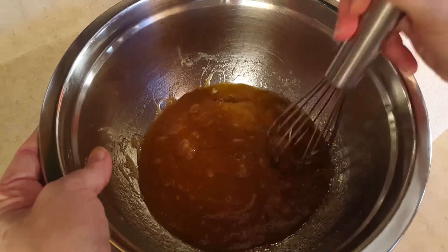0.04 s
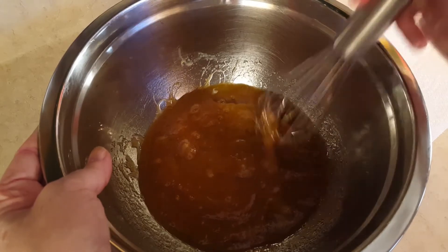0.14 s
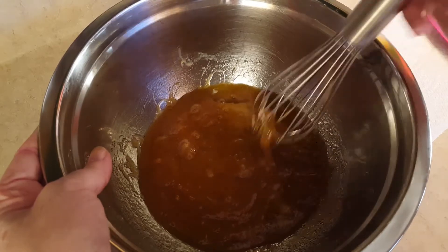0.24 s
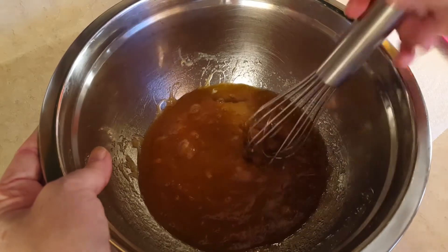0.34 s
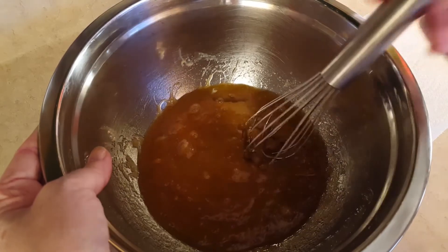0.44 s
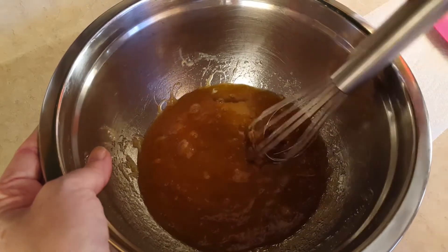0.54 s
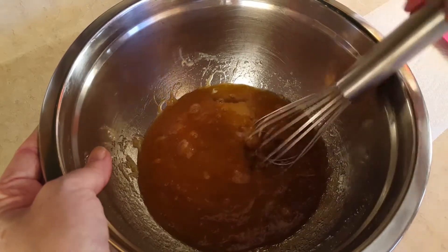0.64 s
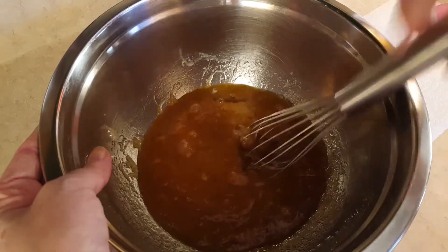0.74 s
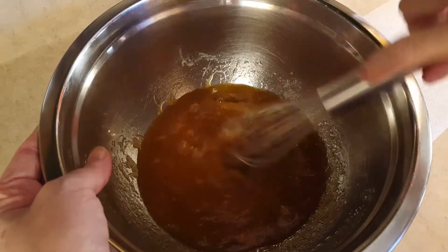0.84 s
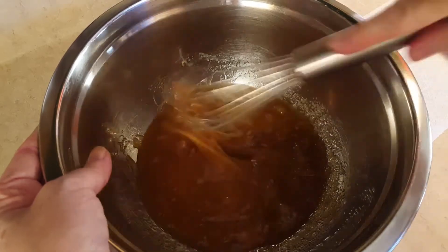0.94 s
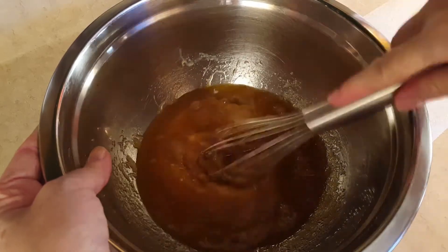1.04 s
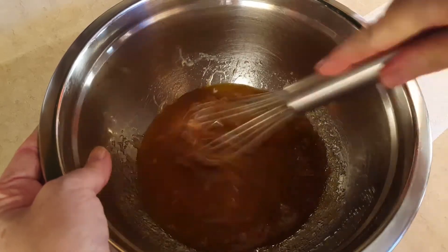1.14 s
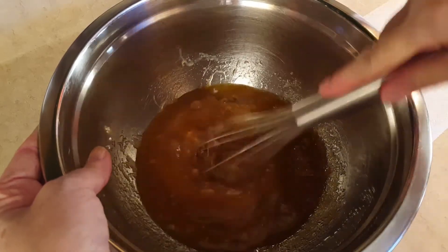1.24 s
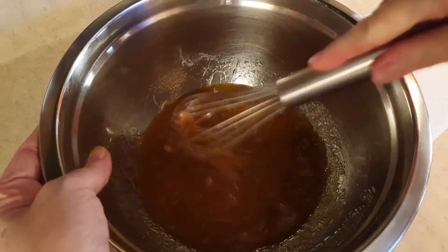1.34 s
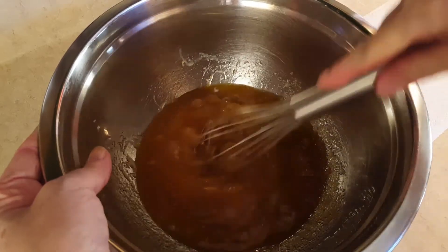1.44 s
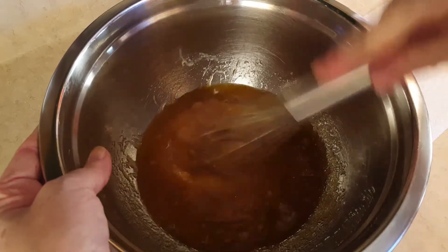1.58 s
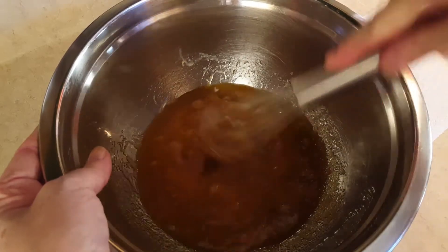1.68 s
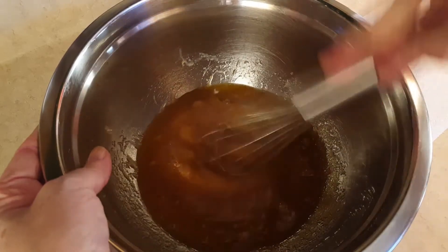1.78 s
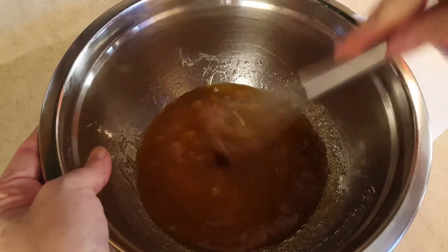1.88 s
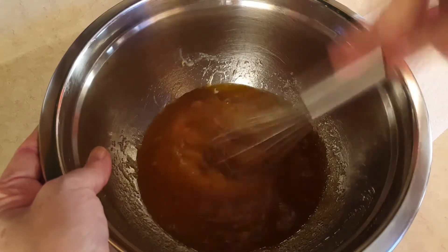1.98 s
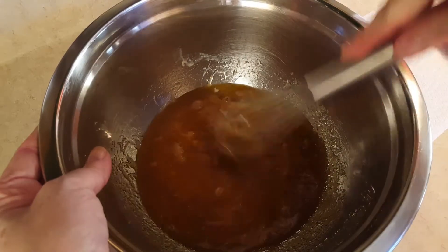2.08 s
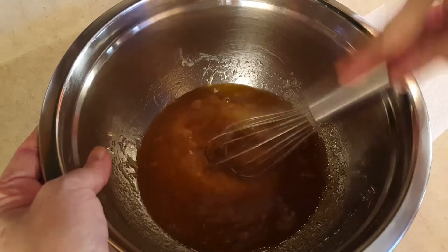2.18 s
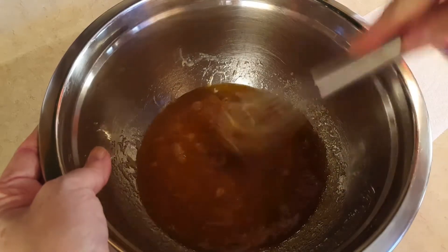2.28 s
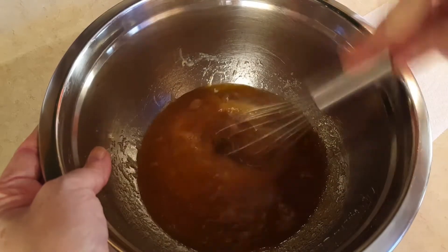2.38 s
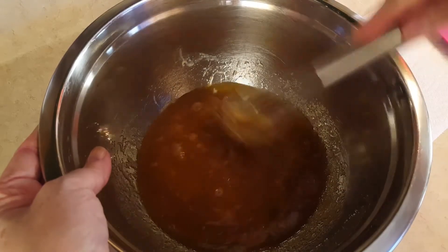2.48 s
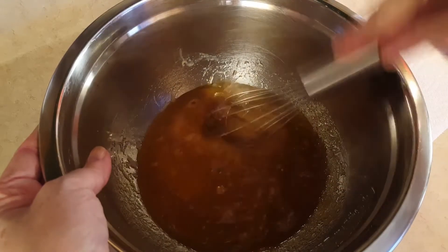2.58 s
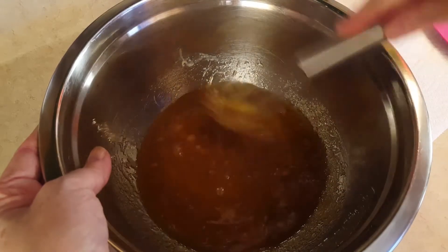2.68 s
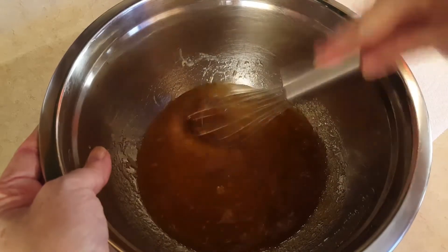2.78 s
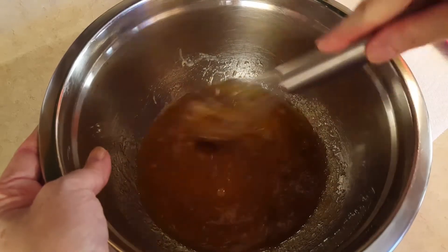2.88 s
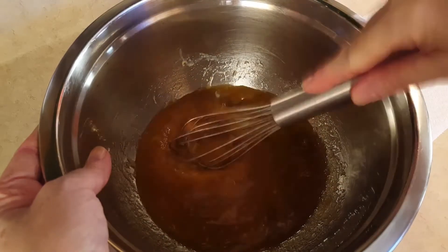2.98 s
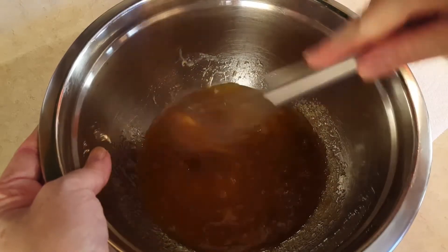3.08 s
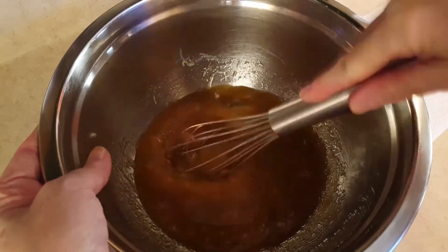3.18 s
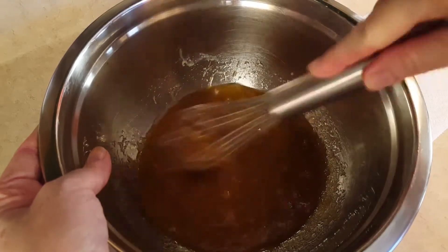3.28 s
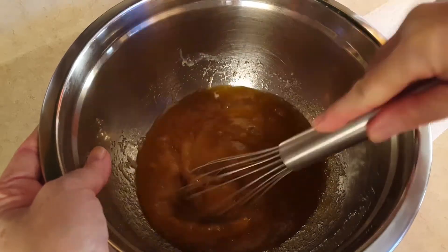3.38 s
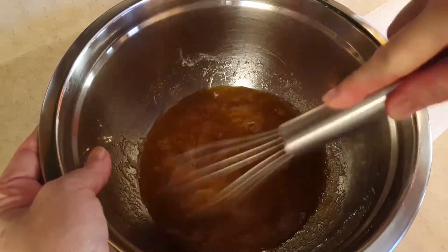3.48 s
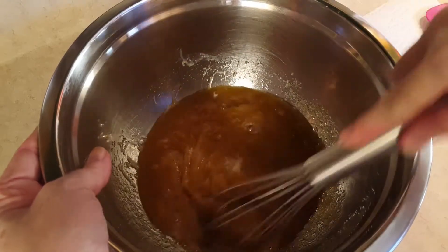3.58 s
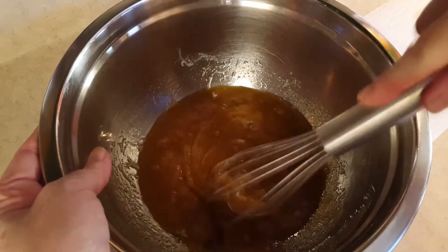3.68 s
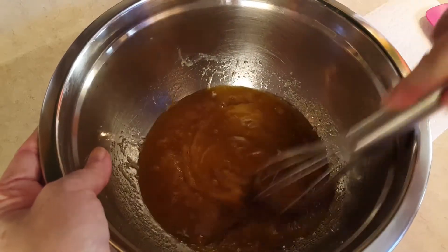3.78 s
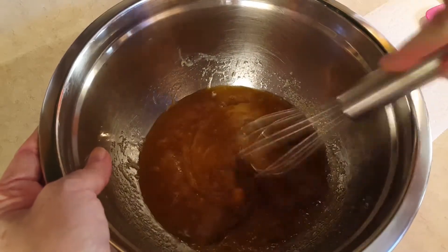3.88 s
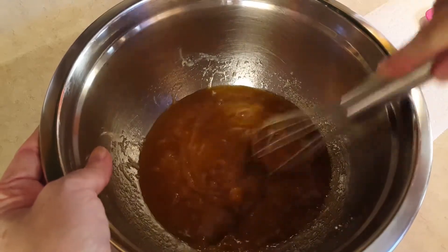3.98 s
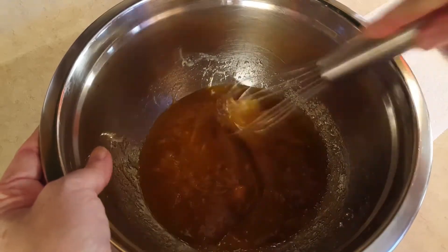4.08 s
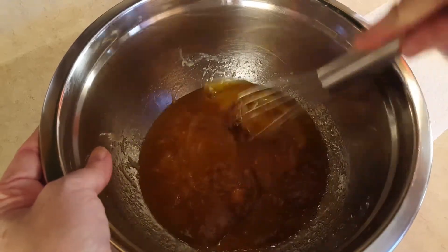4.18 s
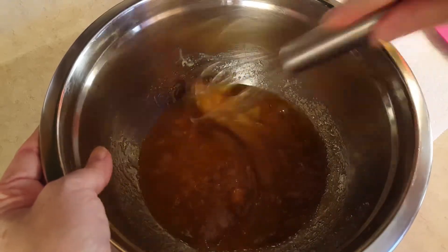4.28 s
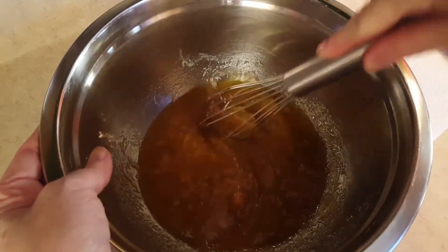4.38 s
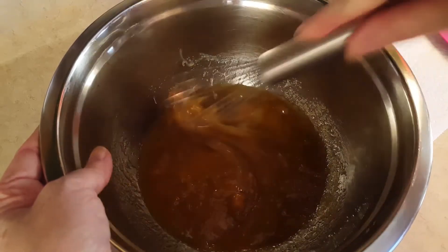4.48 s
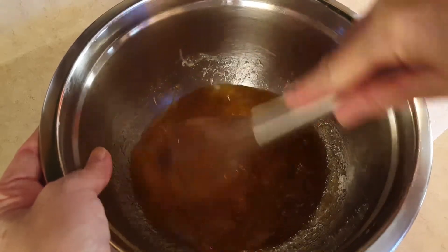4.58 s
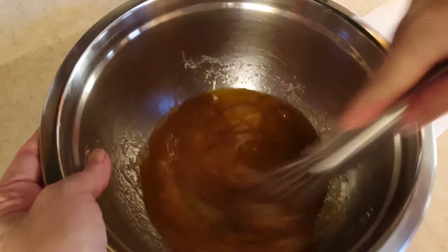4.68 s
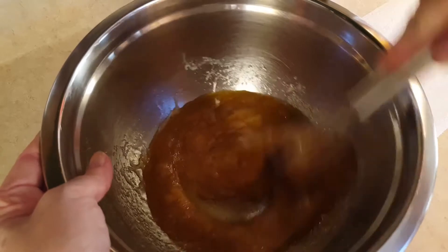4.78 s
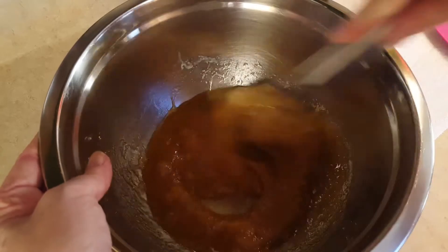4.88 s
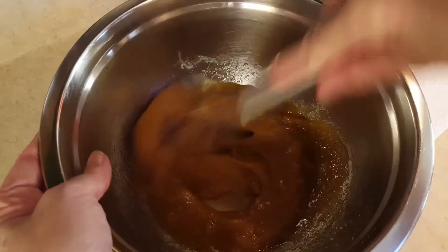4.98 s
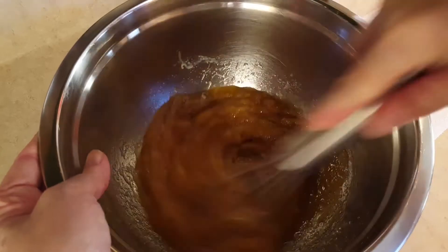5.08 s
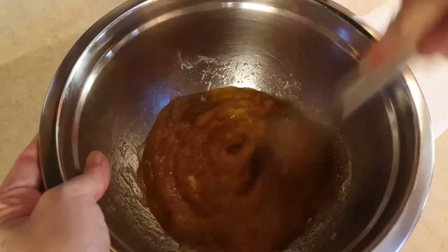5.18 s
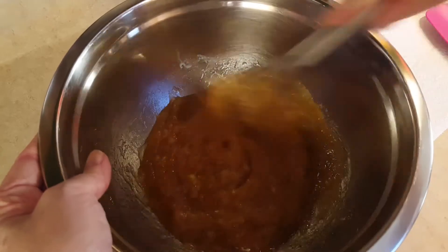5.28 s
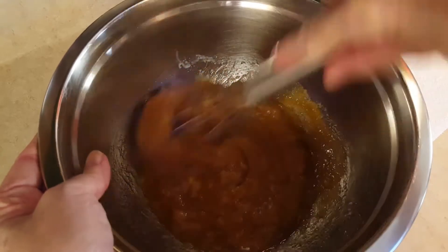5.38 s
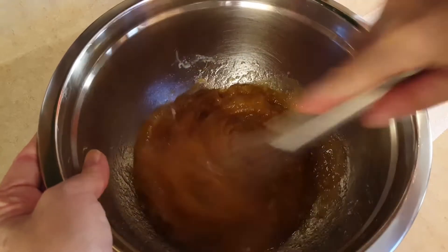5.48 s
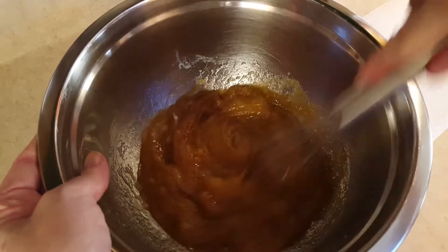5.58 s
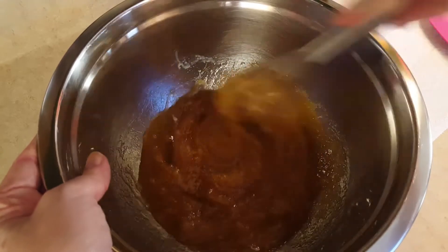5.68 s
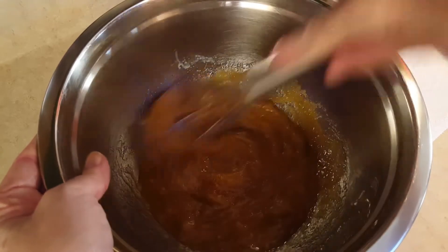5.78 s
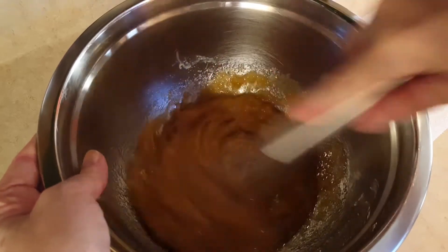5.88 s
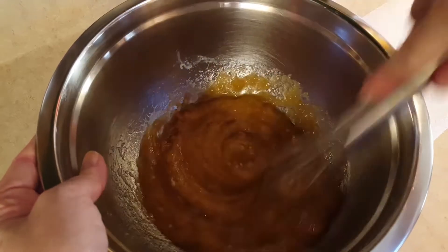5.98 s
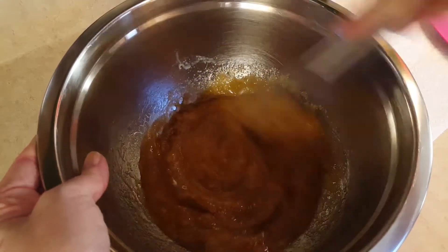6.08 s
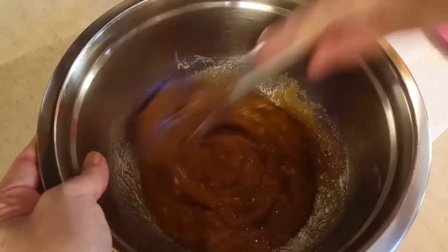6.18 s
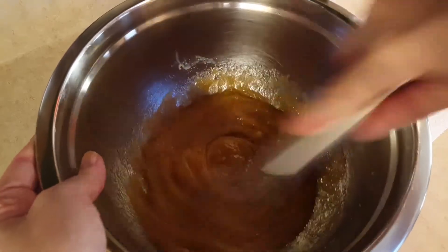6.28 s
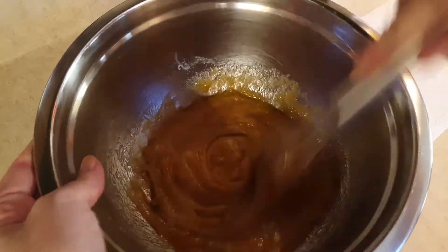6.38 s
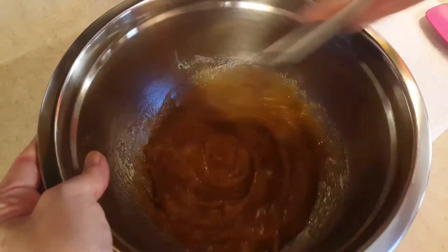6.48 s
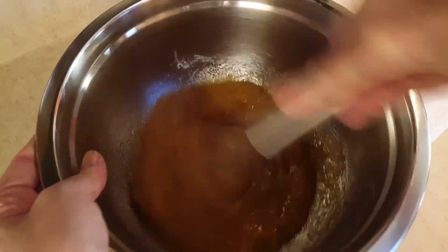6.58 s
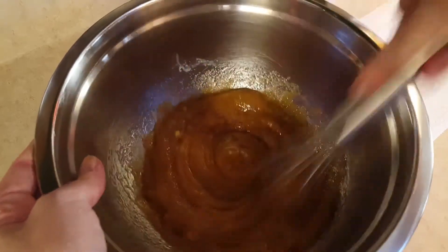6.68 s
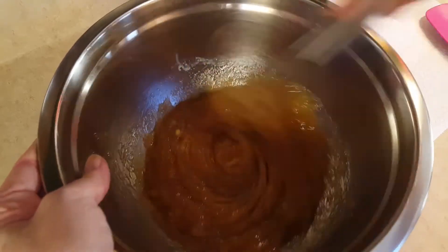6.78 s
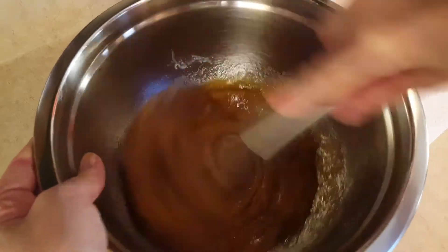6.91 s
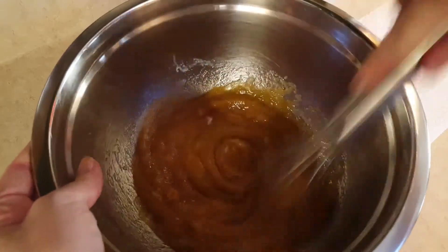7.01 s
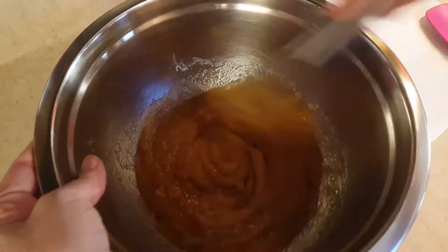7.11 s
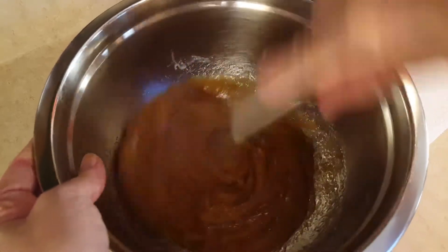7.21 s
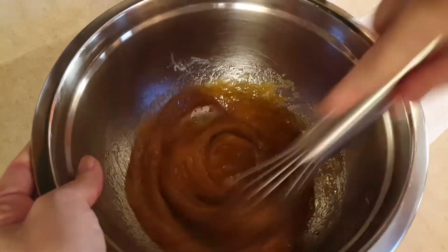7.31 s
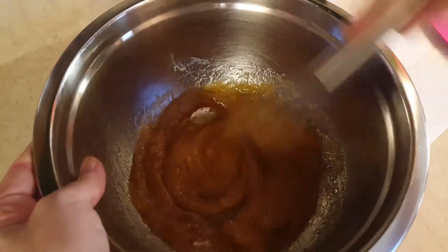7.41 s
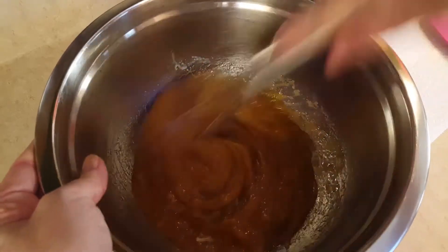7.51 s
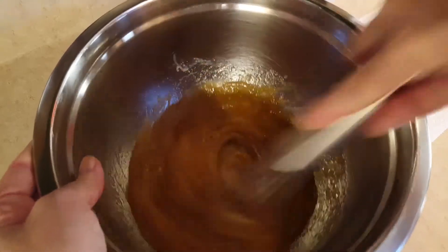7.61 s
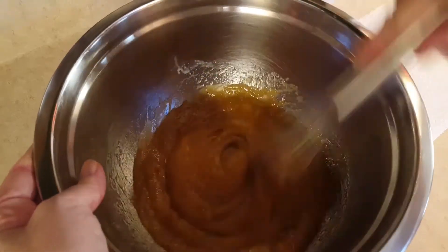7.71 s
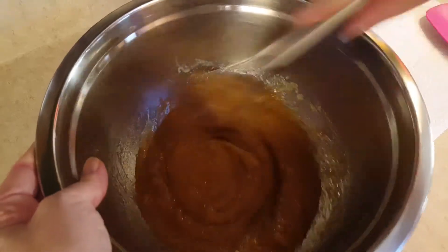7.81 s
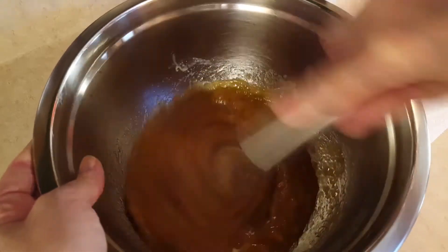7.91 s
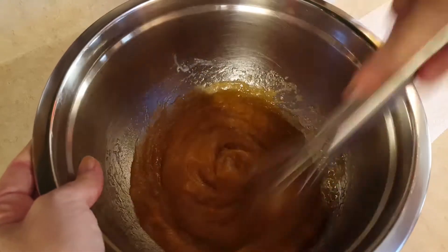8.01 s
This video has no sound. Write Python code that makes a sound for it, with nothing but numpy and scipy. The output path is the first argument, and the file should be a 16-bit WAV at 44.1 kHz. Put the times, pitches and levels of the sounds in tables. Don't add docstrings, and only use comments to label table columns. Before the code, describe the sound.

A few light taps and one bright rim clank lead into steady, evenly spaced whisk strokes, each a quick cluster of wire contacts on a damped steel bowl. Two harder rim hits follow, the last distorted. The background drops, then irregular circular stirring scrapes and crunches over sugar grains with thin wire clinks and soft thuds. Close microphone, short room reflections, automatic gain changing the hiss.

```python
import sys
import numpy as np
from scipy import signal
from scipy.io import wavfile

SR = 44100
rng = np.random.default_rng(int(sys.argv[2]) if len(sys.argv) > 2 else 0)


def persist_wave(psi):
    counts = np.round(np.clip(psi, -1, 1) * 32767).astype(np.int16)
    wavfile.write(sys.argv[1], SR, np.atleast_2d(counts).T)


def boost(x):
    u = np.asarray(x, float) / 20
    return 10 ** u


N = 355005
STIR_START_S = 4.52

# start_s, level_db
ROOM = [
    (0.0, -37.5),
    (3.9, -36),
    (4.15, -53),
    (4.57, -44.5),
    (4.97, -33.5),
    (7.33, -33),
    (8.05, -32),
]
# start_s, peak_db, struck_patch_hz, wire_ticks_db (relative)
BLOWS = [(0.313, -16, 1310, -16), (0.379, -20, 1200, -14.5), (0.566, -22.5, 1150, -22),
         (0.608, -3.5, 1000, -24), (0.984, -10.5, 930, -11.5), (1.182, -16.5, 880, -17.5),
         (1.374, -13.5, 930, -15), (1.566, -9.5, 960, -21), (1.762, -8, 890, -19.5), (1.962, -6, 900, -25),
         (2.154, -8, 1710, -22), (2.356, -6.5, 895, -21), (2.554, -8, 1510, -17), (2.743, -13.5, 850, -18),
         (2.948, -6.5, 900, -26), (3.143, -8, 980, -17), (3.339, -8, 770, -14), (3.53, -11, 800, -6.5),
         (3.742, -1, 970, -17), (3.909, 7, 945, -15.5), (4.305, -18.5, 940, -15.5),
         (4.356, -30.5, 1070, -28), (4.475, -34, 1720, -9.5), (4.515, -22.5, 880, -17)]
# start_s, peak_db, struck_patch_hz, wire_ticks_db (relative)
GLANCES = [(4.699, -18.5, 1000, -18), (4.807, -13, 2030, -17), (4.933, -22.5, 1380, -10),
           (5.005, -9, 970, -21), (5.204, -19.5, 1970, -17), (5.279, -14, 1000, -11.5),
           (5.454, -19, 846, -12), (5.541, -20, 880, -43.5), (5.594, -23.5, 1470, -9.5),
           (5.635, -23, 2240, 2), (5.844, -16.5, 900, -11.5), (5.924, -17, 1760, -11.5),
           (6.089, -10.5, 766, -6), (6.317, -14, 1510, -12), (6.409, -13, 830, -21), (6.461, -12, 1800, -8),
           (6.549, -10, 790, -14), (6.654, -21.5, 1850, -18), (6.77, -15, 880, -6), (6.884, -8.5, 740, -16),
           (7.053, -23, 1200, -8), (7.094, -10.5, 2030, -4.5), (7.189, -19, 1880, -0.5),
           (7.241, -22, 1920, -15), (7.352, -21.5, 744, -16), (7.449, -12, 1760, -10),
           (7.543, -11.5, 890, -7.5), (7.735, -22.5, 1010, -35), (7.79, -11, 850, -3.5),
           (7.895, -21, 740, -10)]
# start_s, peak_db, thin_high_modes_db (relative)
RIM = [
    (0.6057, -6, -11.5),
    (3.74, -8, -9.5),
    (3.9075, -0.5, -16.5),
]
# pitch_hz, level_db, t60_s
WALL = [(880, 4, 0.024), (733, -3, 0.038), (960, 0, 0.046), (1057, -7, 0.029), (1136, -3, 0.055),
        (1316, -3, 0.029), (1447, 0, 0.029), (1608, -3, 0.021), (1700, -1, 0.036), (1867, -2.5, 0.037),
        (2030, -4.5, 0.04), (2266, -4, 0.034), (2414, -3.5, 0.015), (2770, 2.5, 0.0085)]
# pitch_hz, level_db, t60_s
BELLY = [(449, -7.5, 0.035), (466.4, -5.5, 0.071), (504.7, -2.5, 0.065), (536.8, 4.5, 0.11),
         (568, -5, 0.029), (640, -11.5, 0.062), (695, -14.5, 0.045)]
# pitch_hz, level_db, t60_s
LOW_BELLY = [(326, -40, 0.04), (323.2, -6.5, 0.11), (360, -8.5, 0.065), (420.4, -12.5, 0.089)]
# pitch_hz, level_db, t60_s
RIM_LOW = [(900, 16.5, .22), (1044, 7, 0.36), (1117, 9, 0.34), (1265, 6, 0.28), (1454, 5.5, 0.27),
           (1675, 1.5, 0.23), (1720, 0, 0.27), (1850, 2, .2), (2030, -13.5, .12), (2190, -15.5, 0.28)]
# pitch_hz, level_db, t60_s
RIM_HIGH = [(2800, -9, .3), (3330, -9, .2), (3600, 2, 0.2), (3850, 3, 0.22), (4150, 8, 0.2), (4390, 3, .15),
            (4960, 6.5, 0.17), (5160, 2, 0.1), (6050, -2, 0.22), (6600, -4, 0.2)]


def rms_one(x):
    return x / np.sqrt(np.mean(x ** 2) + 1e-20)


def in_time(rows):
    s, *columns = np.transpose(rows)
    return [np.interp(np.arange(N) / SR, s, column) for column in columns]


def gain_ride():
    return in_time(ROOM)[0] - ROOM[0][1]


def at_hz(points, hz):
    point_hz, point_db = np.transpose(points)
    return np.interp(np.log(hz), np.log(point_hz), point_db)


def ring(clicks, hz, t60):
    r = np.exp(-np.log(1000) / (t60 * SR))
    w = 2 * np.pi * hz / SR
    return signal.lfilter([0, np.sin(w)], [1, -2 * r * np.cos(w), r * r], clicks + 1e-18)


def soft(x, cut_hz):
    return signal.sosfilt(signal.butter(2, cut_hz, fs=SR, output="sos"), x)


def band_pass(x, order, low_hz, high_hz):
    return signal.sosfilt(signal.butter(order, [low_hz, high_hz], "band", fs=SR, output="sos"), x)


def flicker(depth_db, rate):
    r = np.exp(-80 * np.pi * rate / SR)
    slow = signal.lfilter([1], [1, -2 * r, r * r], rng.standard_normal(N // 40 + 2002))
    slow = slow[2000:]
    return np.interp(np.arange(N) / 40, np.arange(len(slow)), boost(depth_db * rms_one(slow)))


def room_noise():
    # pitch_hz, level_db (per Hz)
    air = [(15, -35), (25, -5.5), (53, 3), (70, -21), (82, -2), (317, -11.5), (463, -16), (516, -11.5),
           (1260, -29), (10100, -57), (11000, -45), (12200, -59.5), (16000, -63)]
    out = 0
    edges = 25 * 2 ** np.arange(0, 9.6, .5)
    white = rng.standard_normal((2, N))
    wander = [flicker(1.7, 41.0) for k in range(4)]
    for k, (low, high) in enumerate(zip(edges, edges[1:])):
        band = band_pass(white[k % 2], 2, low, high)
        out = out + boost(at_hz(air, np.sqrt(low * high))) * wander[k % 4] * band
    return boost(in_time(ROOM)[0] - 0.5) * rms_one(out)


def fine_modes():
    # pitch_hz, level_db (per Hz)
    grit_spectrum = [(2600, -8.5), (3060, -2), (4080, -3), (5100, -2), (6300, 0), (7300, -5), (9010, -8.5),
                     (12900, -16), (16000, -37.5)]
    pitches = np.geomspace(2600, 15500, 20)
    return [(hz, at_hz(grit_spectrum, hz) + 4.3 * np.log2(hz / 4000), 75.0 / hz) for hz in pitches]


def flurry(s, flurry_ms, count):
    draw = rng.random((len(s), 2, count))
    late = -np.log(1 - .98 * draw[:, 0])
    sizes = np.minimum(late / 0.61, 1) * np.exp(-.35 * late) * boost(-9.0 * draw[:, 1])
    at = (s[:, None] + late * np.reshape(flurry_ms, (-1, 1)) / 1000 - .0025) * SR
    return np.maximum(at, 0).astype(int), sizes / np.sqrt(count) * 2.293


def struck(modes, blow_db, contacts, patch_hz=None, scatter_db=3.5):
    at, sizes = contacts
    hz, mode_db, t60 = np.transpose(modes)
    gain_db = mode_db + scatter_db * rng.standard_normal((len(at), len(modes)))
    if patch_hz is not None:
        octaves_off = np.log2(hz / patch_hz[:, None])
        gain_db = gain_db + 9.0 * np.exp(-(octaves_off / .25) ** 2)
    strength = boost(gain_db) / np.sqrt(np.sum(boost(gain_db) ** 2, axis=1))[:, None]
    strength = strength * boost(blow_db)[:, None]
    out = np.zeros(N)
    for k in range(len(modes)):
        side = rng.uniform(-1.7, 1.7, sizes.shape)
        piled = np.abs(np.sum(sizes * side * np.exp(2j * np.pi * hz[k] * at / SR), axis=1))
        held = np.minimum(2, np.linalg.norm(sizes, axis=1) / piled)
        clicks = (strength[:, k] * held)[:, None] * sizes * side
        out += ring(np.bincount(at.ravel(), clicks.ravel(), N)[:N], hz[k], t60[k])
    return out


def landings():
    # start_s, peak_db, patch_hz, ticks_db (relative), wire_hz
    stray = [(.469, -34, 1780, -25, 3800), (.001, -27.5, 1450, -10, 4200), (3.236, -36.5, 1200, 5, 6040),
             (4.087, -55, 3200, 0, 4500), (4.105, -22.5, 1100, -20, 6000), (4.146, -56.5, 3200, 11, 7500),
             (4.278, -56, 3060, 5, 7500), (4.294, -46, 1510, -9, 3620), (4.525, -31.5, 3000, -2.5, 5500),
             (2.758, -10.5, 880, -17.5, 4470), (3.134, -28, 895, -1, 6000)]
    # start_s, peak_db
    leaders = [(1.162, -28), (1.363, -21.5), (1.938, -29), (2.536, -31.5), (2.736, -23.5), (2.938, -15),
               (3.32, -30), (3.723, -12)]
    leader_rows = [(s, db, 1100, -16) for s, db in leaders]
    rows = np.vstack([BLOWS, GLANCES, leader_rows])
    stirs = rows[:, 0] > STIR_START_S
    wire_hz = np.where(stirs, 6000, 4380)
    spread_oct = np.where(stirs, 0.26, 0.26 / 3)
    scatter = spread_oct * rng.standard_normal(200)[:len(rows)]
    return np.vstack([np.column_stack([rows, wire_hz * 2 ** scatter]), stray]).T


def blows():
    square = [.608, 2.155, 2.356, 2.947, 3.338, 3.742, 3.908, 4.933, 5.279, 6.409, 6.885, 7.451, 7.79]
    # start_s, peak_db, lower_modes_db (relative)
    thuds = [(0.003, -32.5, -4), (0.322, -14, -18), (0.38, -17.5, -13), (0.554, -19, -17),
             (0.605, -11, -14), (0.636, -10.5, -18), (0.985, -14.5, -11), (1.004, -10.5, -3.5),
             (1.182, -19.5, -3.5), (1.38, -8.5, -3.5), (1.571, -10.5, -6), (1.766, -7, -0.5),
             (1.965, -7, -6), (2.159, -7, -6), (2.361, -6, -8.5), (2.401, -13.5, 7.5), (2.565, -3.5, -9),
             (2.744, -11.5, -1), (2.756, -9.5, -0.5), (2.948, -16.5, 10.5), (3.146, -11, 1),
             (3.341, -19, 4), (3.534, -8.5, -8), (3.712, -25.5, 4.5), (3.741, -9.5, -9.5), (3.908, 2, -24),
             (4.109, -27, 2.5), (4.308, -23, -1.5), (4.516, -28.5, -5)]
    # start_s, peak_db, lower_modes_db (relative)
    shoves = [(4.845, -12.5, -23), (4.934, -11, -39), (5.002, -13.5, -12), (5.135, -19, -9),
              (5.279, -9.5, -4), (5.406, -12.5, 2), (5.643, -15.5, -12), (5.683, -13, -8),
              (5.759, -20, -24), (5.999, -30, -9), (6.087, -7, 1.5), (6.234, -16, -11), (6.407, -13, -4),
              (6.444, -11, -6), (6.508, -14.5, -16), (6.546, -16.5, -2), (6.666, -26, 1),
              (6.769, -4.5, -23), (6.792, -9.5, -27), (7.058, -19, -15), (7.098, -16.5, -4),
              (7.158, -7.5, -31), (7.258, -18, -31), (7.345, -13, -7.5), (7.416, -12.5, -15),
              (7.447, -12.5, -5), (7.536, -12, -10), (7.694, -16.5, -2), (7.788, -12, -3.5),
              (7.855, -14, -27)]
    # start_s, peak_db, lower_modes_db (relative)
    nudges = [(4.69, -23.5, -2.5), (4.81, -23, -1), (5.207, -21, -11), (5.544, -33, -6), (5.595, -40, -16),
              (5.815, -17.5, -19), (5.847, -22, -7), (5.928, -21.5, -9), (6.049, -28, -16),
              (6.184, -17, -32), (6.322, -25.5, -6), (6.886, -18.5, -1), (7.016, -20, -14),
              (7.077, -19.5, -14), (7.134, -15, -13), (7.218, -19.5, -18), (7.734, -29, -18),
              (7.899, -23.5, -10)]
    s, wall_db, patch_hz, tick_db, wire_hz = landings()
    spread = np.where(s > 4.6, 1.4, 1.25)
    spread = spread * np.clip((wall_db + 36) / 18, .25, 1)
    is_square = np.abs(s[:, None] - square).min(axis=1) < .004
    spread = spread * np.where(is_square, .45, 1)
    wall = struck(WALL, wall_db + 0.5, flurry(s, 6.5 * spread, count=30), patch_hz)
    ticks = struck(fine_modes(), wall_db + tick_db + 5.5, flurry(s, 5.5 * spread, count=50), wire_hz)
    s, thud_db, low_db = np.transpose(thuds + shoves + nudges)
    pushes = flurry(s + .0015, 7.5, count=14)
    belly = struck(BELLY, thud_db + 3.0, pushes, scatter_db=2.0)
    belly = belly + struck(LOW_BELLY, thud_db + low_db + 3.5, pushes)
    return wall + ticks + soft(belly, 1120)


def knocks():
    # start_s, peak_db, pitch_hz
    beat_knocks = [(0.002, -27, 88), (0.334, -18, 160.6), (0.381, -22, 154), (0.602, -21, 203),
                   (1.013, -22, 179), (1.186, -26, 70.5), (1.373, -22, 142), (1.565, -16, 156),
                   (1.77, -23.5, 126), (1.967, -19, 120), (2.157, -26, 200), (2.194, -25.5, 129),
                   (2.365, -11.5, 96.4), (2.397, -18.5, 214), (2.554, -22, 148), (2.752, -20, 151),
                   (2.941, -20.5, 224), (3.14, -19, 146), (3.341, -20.5, 146), (3.524, -21.5, 68),
                   (3.72, -19.5, 137), (3.903, -14, 132), (4.096, -34.5, 147), (4.314, -30.5, 135)]
    # start_s, peak_db, pitch_hz
    rocks = [(4.839, -24, 101), (4.933, -28, 101), (5.223, -24, 89.5), (5.28, -36, 99), (5.398, -26.5, 161),
             (5.658, -21.5, 131), (5.986, -27.5, 177), (6.085, -30, 145), (6.147, -26, 95),
             (6.4, -11.5, 142), (6.66, -20.5, 93), (6.767, -21, 204), (7.014, -25, 97), (7.104, -28, 104),
             (7.148, -24.5, 118), (7.532, -24, 137), (7.689, -29, 101)]
    out, push = np.zeros(N + SR), np.zeros(N)
    t = np.arange(SR // 4) / SR
    shape = (1 - np.exp(-t / 0.0026)) * np.exp(-t / 0.02)
    for s, peak_db, hz in beat_knocks + rocks:
        i = int((s + 0.007) * SR)
        out[i:i + len(t)] += boost(peak_db + 5.5) * shape * np.sin(2 * np.pi * hz * t)
        push[min(i, N - 1)] = boost(peak_db)
    counter = boost(-2.5) * ring(push, 114.7, 0.15)
    counter += boost(-10.5) * ring(push, 202.5, 0.42)
    counter += boost(-3.5) * ring(push, 48.0, 0.21)
    return out[:N] + counter


def clinks():
    # start_s, peak_db, wire_pitch_hz
    stir_clinks = [(4.5693, -28, 2830), (4.6904, -23, 3940), (4.7693, -42, 4380), (4.7905, -17.5, 3130),
                   (4.8072, -15, 2600), (4.931, -21.5, 5400), (4.987, -38, 6000), (5.0034, -18.5, 3230),
                   (5.133, -23, 2700), (5.2028, -26, 4730), (5.2332, -21, 3300), (5.2792, -20.5, 2900),
                   (5.4032, -19.5, 2960), (5.4852, -28, 2400), (5.5376, -39, 2640), (5.5994, -22, 4330),
                   (5.6354, -26, 6900), (5.6922, -18, 2910), (5.795, -26, 6300), (5.821, -17, 3050),
                   (5.8439, -13, 2500), (5.897, -21, 2700), (5.942, -17, 2900), (6.0487, -25, 5830),
                   (6.0749, -14, 2460), (6.0883, -21, 6700), (6.2467, -20, 2380), (6.3182, -14, 2940),
                   (6.3692, -20, 2440), (6.4185, -16.5, 3200), (6.4617, -14, 5940), (6.5415, -23.5, 6000),
                   (6.5625, -14, 3160), (6.6524, -23, 3700), (6.6979, -39, 3130), (6.7396, -28, 2480),
                   (6.7654, -12.5, 2490), (6.8828, -20, 3130), (7.0153, -29, 2950), (7.0611, -24, 3080),
                   (7.1005, -20, 6030), (7.1409, -11.5, 2770), (7.177, -15, 6260), (7.1926, -27, 6700),
                   (7.2427, -14, 6780), (7.3495, -25, 5600), (7.3794, -35, 2400), (7.4497, -13, 5600),
                   (7.4892, -15.5, 5740), (7.54, -22, 6060), (7.646, -27, 6970), (7.6697, -42, 2430),
                   (7.693, -18, 2540), (7.735, -17, 2390), (7.79, -20, 7600), (7.8364, -21, 5930),
                   (7.8678, -21.5, 6160), (7.897, -15, 2400), (7.989, -32, 6430), (8.0305, -29, 5800)]
    # start_s, peak_db, wire_pitch_hz
    touches = [(.316, -11.5, 1390), (.343, -38, 2980), (.381, -16, 1300), (.469, -37, 3950),
               (.606, -14.5, 4760), (.954, -44, 9450), (.977, -23, 3400), (1.337, -40, 1710),
               (1.354, -34, 3100), (1.379, -15, 1990), (1.524, -47, 2220), (1.541, -33, 2840),
               (1.754, -30, 4460), (1.764, -16.5, 2700), (1.83, -41, 4480), (1.971, -25.5, 2680),
               (2.016, -37, 4400), (2.142, -37, 4380), (2.155, -12.5, 2600), (2.199, -36, 4300),
               (2.345, -43, 4430), (2.357, -19.5, 4400), (2.402, -30, 4300), (2.418, -32, 5900),
               (2.55, -28, 1970), (2.557, -18.5, 1750), (2.603, -23, 2220), (2.76, -15.5, 1960),
               (2.924, -32.5, 2280), (2.934, -25, 2960), (3.117, -35, 2340), (3.192, -24, 1680),
               (3.506, -26, 1880), (3.532, -26.5, 3600), (3.703, -28, 1730), (3.717, -21, 2270),
               (3.744, -22, 3750), (3.755, -29, 5050), (3.911, -12.5, 2200), (5.158, -28, 1500),
               (5.546, -26, 950), (5.612, -27, 4450), (6.74, -19, 2100), (7.02, -20, 1500),
               (7.603, -25, 5500), (7.697, -26.5, 7500)]
    clink_db, edge_db, t60_s, width_oct, spread_ms = -11, -5.5, 0.046, .3, 4.0
    rows = stir_clinks + touches
    out, t = np.zeros(N + SR), np.arange(SR // 12)[:, None] / SR
    luck, edge = rng.random((120, 4, 12)), rng.standard_normal((120, SR // 12))
    for (s, peak_db, hz), (pitch, late, size, life), hiss in zip(rows, luck, edge):
        age = np.maximum(t - late * spread_ms / 1000, 0)
        off = 2 * pitch - 1
        touch_hz = hz * 2 ** (width_oct * off * np.abs(off))
        touch_t60 = t60_s * min(hz / 6000, 1) * (.4 + life)
        swing = np.sin(2 * np.pi * touch_hz * age)
        tone = np.sum(swing * boost(-60 * age / touch_t60 - 8 * size), axis=1)
        bright = boost(edge_db) * hiss * np.exp(-t[:, 0] / 0.0047)
        start = int((s - .001) * SR)
        out[start:start + len(t)] += boost(peak_db + clink_db) * (tone + bright)
    return band_pass(out[:N], 1, 1200, 9000)


def split(modes):
    return [(hz * (1 + .011 * step), db - 2 - 2 * abs(step), t60 * (1 - .15 * abs(step)))
            for hz, db, t60 in modes for step in (-2.1, -.9, .1, .8, 1.9)]


def rim():
    # start_s, level_db, pitch_hz, t60_s
    ping = (4.356, -31, 1122, .1)
    out, t = np.zeros(N), np.arange(SR // 3)[:, None] / SR
    for s, rim_db, high_db in RIM:
        for modes, level_db in ((RIM_LOW, rim_db - 26.5), (RIM_HIGH, rim_db + high_db - 17.5)):
            hz, mode_db, t60 = np.transpose(split(modes))
            luck = rng.random((2, len(hz)))
            fade = np.exp(-np.log(1000) * t / t60) * (1 - np.exp(-t / 0.00046))
            swing = np.sin(2 * np.pi * (hz * t + luck[0])) * fade
            start = int(s * SR)
            out[start:start + len(t)] += np.sum(swing * boost(level_db + mode_db - 4 * luck[1]), axis=1)
    ping_s, ping_db, ping_hz, ping_t60 = ping
    tap = boost(ping_db) * (np.arange(N) == int(ping_s * SR))
    return out + ring(tap, ping_hz, ping_t60)


def cracks():
    s, rim_db, high_db = np.transpose(RIM)
    marks = np.bincount((s * SR).astype(int), boost(rim_db - 11.5), N)
    edge = signal.lfilter([1], [1, -np.exp(-1 / (0.0013 * SR))], marks) * rng.standard_normal(N)
    return band_pass(edge, 1, 900, 7000)


def stirring(dip_db):
    # start_s, grit_db
    rounds = [(4.62, -43.5), (4.802, -37.5), (5.0, -38), (5.3, -36.5), (5.682, -34), (6.103, -37),
              (6.27, -36.5), (6.47, -39.5), (6.8, -35), (7.12, -41), (7.481, -36.5), (7.8, -37),
              (8.15, -39)]
    t, (s, crest_db) = np.arange(N) / SR, np.transpose(rounds)
    turn = np.interp(t, s, np.arange(len(s)))
    depth = np.interp(t, s[1:], np.diff(s)) / 0.35
    rise = np.clip((t - STIR_START_S) / .2, 1e-3, 1)
    return np.interp(t, s, crest_db) - dip_db * depth * np.sin(np.pi * turn) ** 2 + 20 * np.log10(rise)


def skid(s, level_db, lead_s, tail_s):
    marks = np.bincount(((s + 0.005) * SR).astype(int), boost(level_db), N)[:N]
    lead, tail = np.exp(-1 / (lead_s * SR)), np.exp(-1 / (tail_s * SR))
    after = signal.lfilter([1], [1, -tail], marks)
    before = signal.lfilter([lead], [1, -lead], marks[::-1])[::-1]
    return after + 0.44 * before


def dragged(modes, level, per_s, spread_db, damp, patchy_db):
    born = np.flatnonzero(rng.random(N) < per_s / SR)
    sizes = boost(spread_db * np.minimum(rng.exponential(1, N)[:len(born)], 3.2))
    sizes = sizes * flicker(1.3, 29.0)[born]
    dealt = rng.integers(0, 6, N)[:len(born)]
    patches = [flicker(patchy_db, 13.0)[born] for k in range(6)]
    out = np.zeros(N)
    for k, (hz, db, t60) in enumerate(modes):
        slips = np.zeros(N)
        slips[born] = sizes * (dealt == k % 6) * patches[6 * k // len(modes)] * (-1.) ** born
        out += boost(db) * ring(slips, hz, t60 * damp)
    return level * rms_one(out)


def rim_rattle():
    rattle_s, settle_s = .2, .185
    s, rim_db, high_db = np.transpose(RIM)
    rattle = skid(s, np.minimum(rim_db, -5.0), lead_s=.001, tail_s=rattle_s)
    sunk = np.exp(-settle_s / rattle_s) * np.roll(rattle, int(settle_s * SR))
    return soft(np.maximum(rattle - sunk, 0), 40)


def pins():
    born = rng.random(N) < 260 * flicker(4.0, 20.0) / SR
    snaps = born * boost(2.0 * np.minimum(rng.exponential(1, N), 3))
    ticks = signal.lfilter([1], [1, -np.exp(-1 / (.0005 * SR))], snaps) * rng.standard_normal(N)
    level = boost(-9 + stirring(9.7)) + boost(-76 + gain_ride())
    return level * rms_one(band_pass(ticks, 2, 1500, 7500))


def swish():
    # start_s, level_db, start_hz, end_hz, length_s
    squeak = (4.797, -19, 2600, 1750, .03)
    s, swish_db, from_hz, to_hz, length_s = squeak
    t = np.clip((np.arange(N) / SR - s) / length_s, 0, 1)
    phase = 2 * np.pi * np.cumsum(from_hz * (to_hz / from_hz) ** t) / SR
    return boost(swish_db) * np.sin(np.pi * t) ** 2 * np.sin(phase) * flicker(3.7, 160.0)


def drag():
    # over_grit_db, dip_between_rounds_db, while_beating_db, rattle_after_rim_blow_db (relative)
    layers = [
        (8.5, 10.5, -50.5, -28.5),
        (3, 5.5, -58, -39),
        (-0.5, 10, -70, -71),
    ]
    rattle = rim_rattle()
    levels = []
    for over_db, dip_db, beat_db, rattle_db in layers:
        stir_level = boost(over_db + stirring(dip_db))
        beat_level = boost(beat_db + gain_ride())
        levels.append(stir_level + beat_level + boost(rattle_db) * rattle)
    belly_level, wall_level, grit_level = levels
    s, blow_db, patch_hz, tick_db = np.transpose(BLOWS + GLANCES)
    wall_level = wall_level + skid(s, np.minimum(blow_db, -8.0) - 20.5, lead_s=0.011, tail_s=0.03)
    grit_level = grit_level + skid(s, np.minimum(blow_db + tick_db, -22.0) - 16, lead_s=0.015, tail_s=0.033)
    belly_modes = LOW_BELLY[1:3] + BELLY
    belly = dragged(belly_modes, belly_level, per_s=900, spread_db=0.0, damp=0.88, patchy_db=3.0)
    wall = dragged(WALL, wall_level, per_s=3500, spread_db=3.5, damp=0.57, patchy_db=3.5)
    grit = dragged(fine_modes(), grit_level, per_s=4000, spread_db=4.0, damp=0.75, patchy_db=2.5)
    speck_level = boost(-24 + stirring(2.0)) + boost(-43.5) * rattle
    bare_modes = RIM_LOW[6:] + RIM_HIGH
    specks = dragged(bare_modes, speck_level, per_s=2700, spread_db=-9.0, damp=0.15, patchy_db=1.0)
    return soft(belly, 860) + specks + wall + grit + pins() + swish()


def kitchen(x):
    t60_s, wall_cut_hz = 0.31, 6500
    out, dull = np.zeros(N), np.exp(-2 * np.pi * wall_cut_hz / SR)
    for k, lag in enumerate((rng.uniform(.011, .04, 10) * SR).astype(int)):
        loop, state = x.copy(), [0.]
        gain = np.exp(-np.log(1000) * lag / SR / t60_s)
        for i in range(lag, N, lag):
            back, state = signal.lfilter([gain * (1 - dull)], [1, -dull], loop[i - lag:i], zi=state)
            loop[i:i + lag] += back[:N - i]
        out += (loop - x) * (-1) ** k
    return out


def scene():
    hits = blows() + rim() + cracks() + knocks() + clinks()
    return (hits + boost(-18.5) * kitchen(hits) + drag() + room_noise())[None]


def top_cut(x):
    return signal.sosfilt(signal.butter(12, 15900, fs=SR, output="sos"), x)


def record(dry):
    heard = signal.sosfilt(signal.butter(3, 38, "high", fs=SR, output="sos"), dry)
    limited = heard / (1 + np.abs(heard) ** 8) ** (1 / 8)
    limited = signal.sosfilt(signal.cheby2(10, 40, 16700, fs=SR, output="sos"), limited)
    return top_cut(limited)


dry = scene()
out = record(dry)
persist_wave(out)
```